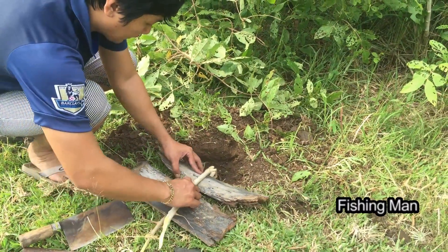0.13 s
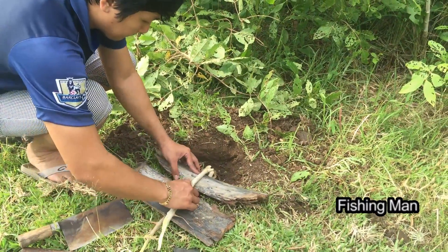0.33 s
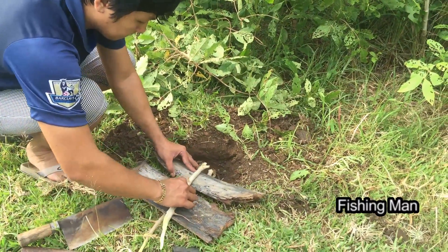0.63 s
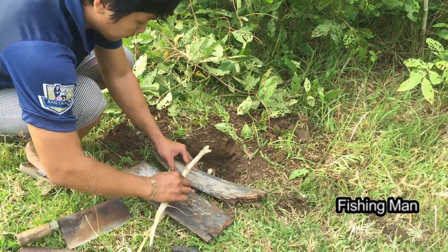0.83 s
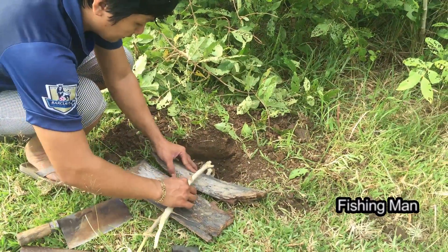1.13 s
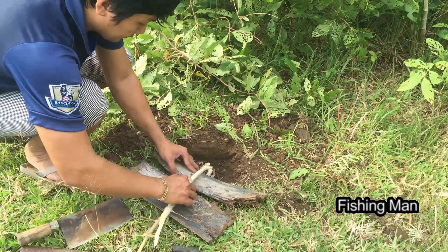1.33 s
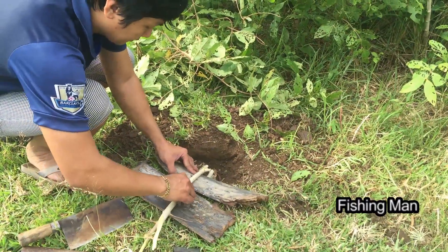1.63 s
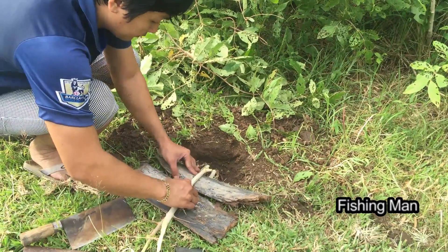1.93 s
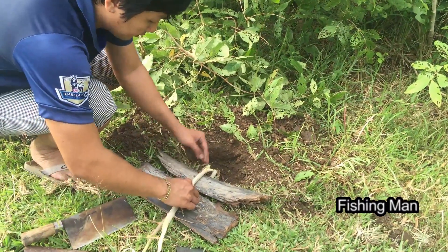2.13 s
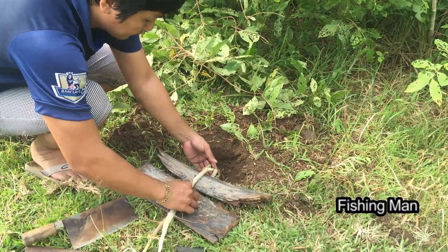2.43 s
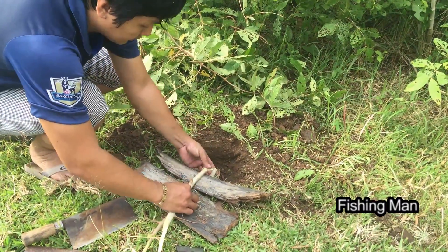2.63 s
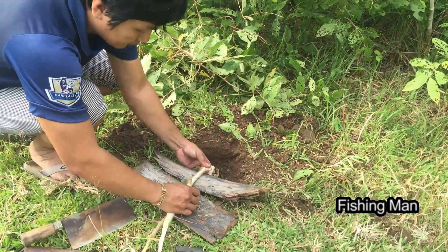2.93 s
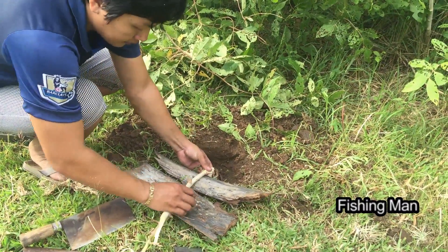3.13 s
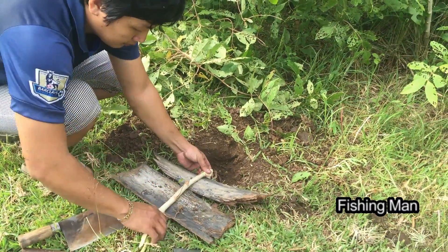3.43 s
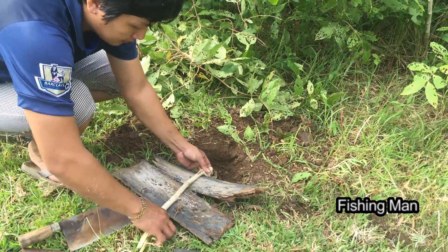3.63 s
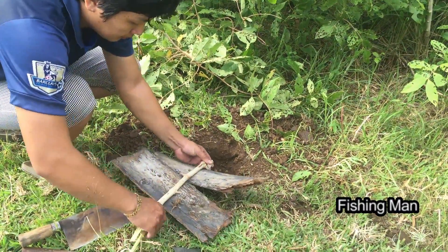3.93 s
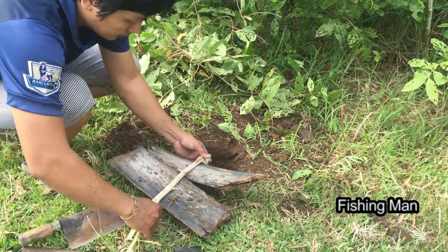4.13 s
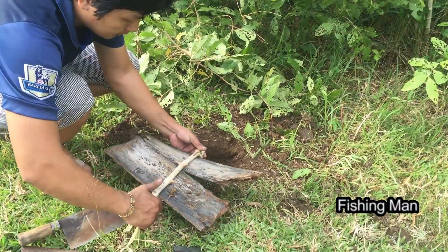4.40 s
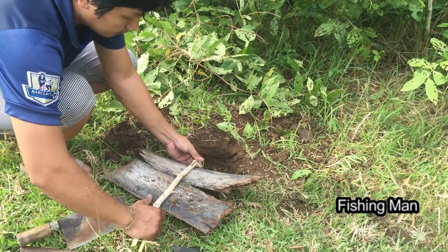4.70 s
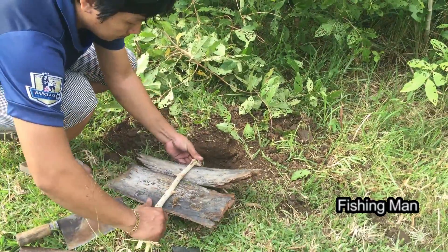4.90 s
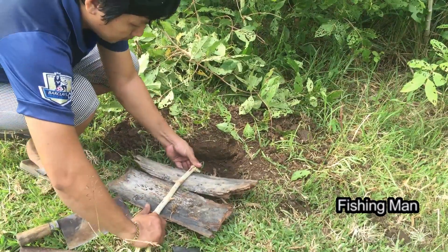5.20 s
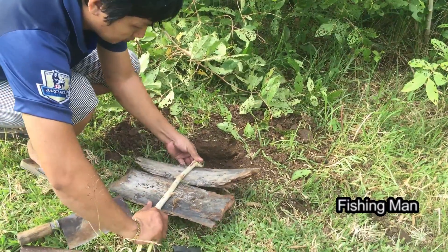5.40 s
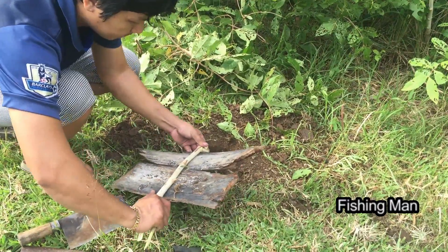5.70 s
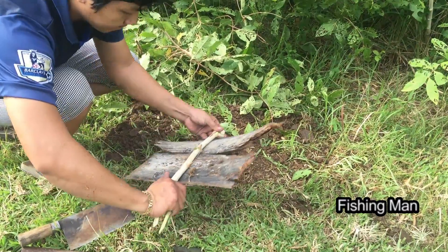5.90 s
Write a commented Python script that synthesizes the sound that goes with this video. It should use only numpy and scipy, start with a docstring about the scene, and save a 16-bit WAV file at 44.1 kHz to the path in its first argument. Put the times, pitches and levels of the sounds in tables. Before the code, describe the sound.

Outdoors, bark and stick snap, knock and lightly scrape, one sharp knock standing out, while birds chirp nearby and a distant engine hums.

```python
"""A motor drones far off over open-country air and dry grass rustles throughout. Someone crouching on grass fits
a stick across two bark slabs: fibres snap (click clusters), dead wood knocks (damped slab modes), soil bumps
(low cycles), scrapes (sparse clicks), then splinter pings (decaying sines) and rubs (slips ringing the slab).
Small birds (gliding tones) join early: whistles, slurs, then scolds (tone plus noise), chips and, late, a
nasal chatter. Ground and vegetation scatter a faint tail."""
import sys
import numpy as np
from scipy import signal
from scipy.fft import rfft
from scipy.io import wavfile
from scipy.ndimage import map_coordinates

SR = 44100
rng = np.random.default_rng(int(sys.argv[2]) if len(sys.argv) > 2 else 0)


def put_to_file(sound):
    """Save the sound as 16-bit audio at rate SR, in the file named by the first command-line argument."""
    columns = np.atleast_2d(sound).T  # one column per channel
    safe = np.clip(columns, -1, 1)
    whole_steps = np.round(safe * 32767)
    wavfile.write(sys.argv[1], SR, whole_steps.astype(np.int16))


N = 266937

# Colour of clicks on dry bark and blades. Each row: frequency in Hz, gain in dB.
BARK_COLOUR = [(300, 3.5), (900, 5), (2000, 2), (3200, 1.5), (4300, 1), (6200, -0.5), (7300, -3.5),
               (8500, -2.5), (10700, -10.5), (12300, -6), (16000, -10.5)]
SLUR_RISE_SHARE = 0.298  # onset of a slur or chatter note over its length


def undb(db):
    """Decibels to amplitude ratio."""
    return 10 ** (np.asarray(db) / 20)


def unit(x):
    """Scale to rms 1."""
    return x / np.sqrt(np.mean(x ** 2))


def add(out, start_s, x):
    """Mix x into out from start_s, cropping at both ends."""
    i = int(round(start_s * SR))
    a, b = max(i, 0), min(i + len(x), N)
    out[a:b] += x[a - i:b - i]


def colour(x, points, tilt_db=0):
    """Shape by a (Hz, dB) spectrum and a slope in dB per octave above 1 kHz; rms 1."""
    hz, db = np.transpose(points)
    octave = np.log2(np.fft.rfftfreq(len(x), 1 / SR) + 1)
    gain_db = np.interp(octave, np.log2(hz), db)
    gain_db = gain_db + tilt_db * np.maximum(octave - np.log2(1000), 0)
    return unit(np.fft.irfft(rfft(x) * undb(gain_db), len(x)))


def walk(rate_hz, n):
    """Smooth random curve through rate_hz knots per second, spread near 1."""
    knots = np.arange(n) / SR * rate_hz
    return map_coordinates(rng.standard_normal(8192), [knots], order=2, mode="mirror")


def random_clicks(n, grain_db, cap, per_s):
    """Sparse clicks of random sign and size; cap limits the exponential draw."""
    sizes = undb(grain_db * np.minimum(rng.exponential(size=n), cap))
    return sizes * rng.choice([-1, 1], n) * (rng.random(n) < per_s / SR)


def motor(waver_db=3.5):
    """A far engine speeds up evenly, loudest midway: only low orders carry, each wavering on the way."""
    # Levels in dB of multiples 1-5 of the firing rate.
    orders_db = [-6.5, 1, -6.5, -15, -24.5]
    firing_hz, rise_hz_per_s = 58.4, 0.9
    peak_db, loudest_s, fade_db_per_s = -54, 2.67, 2.04
    t = np.arange(N) / SR
    hz = (firing_hz + rise_hz_per_s * t) * (1 + 0.0035 * walk(11, N))
    phase = 2 * np.pi * np.cumsum(hz) / SR
    drone = np.zeros(N)
    for k, order_db in enumerate(orders_db, 1):
        level = undb(order_db + waver_db * walk(4.7, N))
        drone += level * np.sin(k * phase + 2 * np.pi * rng.random())
    return np.sqrt(2) * drone * undb(peak_db - fade_db_per_s * np.abs(t - loudest_s))


def air(level_db=-50, drift_db=0.9):
    """Shaped noise: distant rumble and soft open-country hiss that swells and sinks a little."""
    # Each row: frequency in Hz, relative density in dB per Hz.
    air_colour = [(22, -34.5), (40, -12), (55, -1), (110, -4), (160, -9), (240, -21), (380, -32),
                  (800, -45), (1400, -36.5), (2600, -41), (4500, -44), (9000, -49.5), (10500, -48),
                  (15800, -51.5)]
    return colour(rng.standard_normal(N), air_colour) * undb(level_db + drift_db * walk(7, N))


def slab(centre_hz, spread_oct, tuning=1):
    """The slab's short causal ring on soil; the contact point decides which damped modes speak."""
    # Each row: mode in Hz before tuning, width in Hz, level in dB.
    modes = [(325, 130, -1), (614, 95, 4.5), (790, 130, -9.5), (907, 140, -0.5), (1049, 91, 3.5),
             (1550, 120, -3.5), (1892, 180, -12.5), (2260, 170, -5.5), (3200, 250, -12), (3520, 550, -16),
             (4270, 390, -22), (6110, 500, -37.5)]
    f = np.fft.rfftfreq(4096, 1 / SR) + 1
    hz, width_hz, db = np.transpose(modes)[:, :, None]
    detune = (f ** 2 - (hz * tuning) ** 2) / (f * width_hz)
    power = np.sum(undb(db) ** 2 / (1 + detune ** 2), axis=0)
    gain = np.sqrt(power) * np.exp(-.5 * (np.log2(f / centre_hz) / spread_oct) ** 2)
    # minimum phase: fold the cepstrum onto positive time
    cepstrum = np.fft.irfft(np.log(gain + gain.max() / 1000))
    half = len(cepstrum) // 2
    folded = np.r_[cepstrum[0], 2 * cepstrum[1:half]]
    return np.fft.irfft(np.exp(np.fft.rfft(folded, 2 * half)))[:half]


def grass(rustle_db=-71, wood_db=-73.0, stir_db=6.0):
    """Dry blades tick in fits under hands and feet; the nudged slab murmurs faintly."""
    def ticks():
        """Clicks whose strength comes and goes."""
        return random_clicks(N, 3.0, 3, per_s=400) * undb(stir_db * np.tanh(walk(22, N)))
    murmur = unit(signal.fftconvolve(ticks(), slab(1520, 1.0))[:N])
    rustle = colour(ticks(), BARK_COLOUR, tilt_db=-2.5)
    return undb(rustle_db) * rustle + undb(wood_db) * murmur


def fibres(table, rise_share, grain_db, per_s, ring_db):
    """Clusters of fibre clicks swell and die, coloured by bark and each spot's own resonances."""
    out, t = np.zeros(N), np.arange(-8192, 16384) / SR
    hz = np.linspace(300, 16000, 48)
    bark_hz, bark_gain_db = np.transpose(BARK_COLOUR)
    bark_db = np.interp(np.log(hz), np.log(bark_hz), bark_gain_db)
    for peak_s, db, fall_s, tilt_db in table:
        shape = np.exp(-np.maximum(-t / rise_share, t) / fall_s)
        clicks = random_clicks(len(t), grain_db, 4, per_s)
        spot = np.c_[hz, bark_db + ring_db * rng.standard_normal(len(hz))]
        cluster = colour(clicks * shape, spot, tilt_db)
        add(out, peak_s + t[0], cluster * np.sqrt(np.mean(shape ** 2)) * undb(db))
    return out


def snaps():
    """Bark fibres and dry blades snap in quick dense clusters."""
    # Each row: peak in seconds, level in dB, fall constant in seconds, tilt in dB per octave.
    snap_rows = [(.009, -41, 0.0064, 1), (.027, -54.5, 0.0036, 1), (.0995, -52, 0.0013, 0),
                 (.2166, -35, 0.0038, 3), (.589, -49, 0.0018, -2), (.855, -51.5, 0.0027, 0),
                 (.872, -53, 0.0025, 0), (1.5484, -39, 0.0012, -5), (1.5518, -28.5, 0.00093, 8),
                 (1.5538, -37, 0.0041, -1.5), (1.5675, -20, 0.0022, -9), (2.125, -47, 0.0011, -0.5),
                 (2.182, -53.5, 0.013, 1), (2.1877, -46, 0.001, 1), (2.792, -55, 0.0016, -1.5),
                 (3.7008, -43, 0.0054, -2), (3.7264, -28.5, 0.0034, 1.5), (3.734, -44, .003, 4),
                 (4.0608, -49.5, 0.003, 18), (4.2965, -52.5, 0.0011, 5), (4.6235, -51, 0.0017, -1.5),
                 (4.6704, -49, 0.00076, 3), (5.805, -53, 0.003, 3), (5.815, -53.5, 0.0048, 2.5),
                 (6.0295, -52, 0.0015, 2)]
    return fibres(snap_rows, rise_share=0.64, grain_db=1.5, per_s=14000, ring_db=1.5)


def knocks(bend_hz=800, bend_q=0.94):
    """Dead wooden knocks; bending waves spread each one a little, the high ones arriving first."""
    # Each row: start in seconds, peak in dB, centre of the excited modes in Hz, their spread in octaves,
    # tuning of the modes under the grip as a ratio.
    contacts = [(0.0986, -32, 1390, 0.36, 0.9), (1.5526, -29, 1190, 0.64, 1.05),
                (1.5664, -6, 960, 1.76, 0.98), (1.5708, -24.5, 797, 0.81, 0.98),
                (1.5736, -24, 850, 0.73, 0.91), (2.1575, -47, 1300, 0.38, 1.2),
                (2.178, -42, 2080, 0.67, .97), (3.4126, -39, 520, 0.78, 1.13), (3.659, -47, 1060, 0.4, 1),
                (3.7, -30, 830, 0.26, 0.84), (3.7269, -21, 1150, 0.45, 0.99),
                (3.751, -41.5, 368, 0.48, 1.04), (3.869, -48, 1310, 0.64, 1.24),
                (4.2685, -44.5, 560, 0.66, 1.08), (4.296, -47.5, 1330, 0.42, 1.34),
                (4.6239, -52, 396, 0.26, 1.03), (5.066, -46.5, 800, 1.4, 1.25),
                (5.077, -39.5, 537, 0.29, 0.87)]
    out, w = np.zeros(N), 2 * np.pi * bend_hz
    allpass = signal.bilinear([1, -w / bend_q, w * w], [1, w / bend_q, w * w], SR)
    for start_s, peak_db, centre_hz, spread_oct, tuning in contacts:
        ring = signal.lfilter(*allpass, slab(centre_hz, spread_oct, tuning))
        add(out, start_s, ring * undb(peak_db) / np.abs(ring).max())
    return out


def bumps(soil_hz=232.2, swell_s=0.013):
    """Soft pushes ring the same patch of ground: a few low wavering cycles swell and fade."""
    # Each row: start in seconds, envelope peak in dB.
    pushes = [(0.119, -43), (1.847, -43.5), (2.055, -47), (2.975, -42), (3.184, -46), (5.511, -45.5),
              (5.912, -46)]
    out, t = np.zeros(N), np.arange(SR // 6) / SR
    shape = t / swell_s * np.exp(1 - t / swell_s)
    for start_s, db in pushes:
        phase = 2 * np.pi * np.cumsum(soil_hz * (1 + 0.14 * walk(170, len(t)))) / SR
        add(out, start_s, undb(db) * shape * np.sin(phase))
    return out


def scrapes():
    """Stick and fingers slide over dry bark and grass: slower, sparser clicks."""
    # Each row: peak in seconds, level in dB, fall constant in seconds, tilt in dB per octave.
    slides = [(.13, -54.5, 0.054, -5), (.25, -56, 0.03, -1.5), (.49, -64, 0.068, -1),
              (.71, -59.5, 0.044, -3), (.86, -58, 0.022, -2.5), (1.115, -62.5, 0.036, -7),
              (1.585, -52, .012, 1), (1.635, -60, 0.06, -3.5), (1.733, -50, 0.019, -3),
              (3.14, -61, 0.03, -1.5), (3.335, -67, 0.015, 7), (3.438, -59, 0.02, 1),
              (3.77, -59.5, 0.088, 2), (3.97, -65, 0.09, 4), (4.77, -66, 0.054, 2.5), (4.9, -59, 0.019, -3),
              (5.085, -55.5, 0.018, -3.5), (5.245, -63, 0.065, 2.5), (5.78, -63.5, 0.055, 3),
              (5.99, -63, 0.04, 4)]
    return fibres(slides, rise_share=0.94, grain_db=1.0, per_s=1700, ring_db=3.0)


def whistle(length_s, start_hz, end_hz, hoarse_hz, harmonics_db=(0,), onset_s=0.0017, fade_s=0.011, arch_hz=0):
    """A note glides fast, then settles, and may arch; hoarseness flutters pitch and breaks up level."""
    t = np.arange(int(length_s * SR)) / SR
    hz = start_hz + (end_hz - start_hz) * (t / length_s) ** 0.78
    hz = hz + hoarse_hz * walk(905.4, len(t)) * 1.4
    hz = hz + arch_hz * (np.sin(np.pi * t / length_s) - 2 / np.pi)
    phase = 2 * np.pi * np.cumsum(hz) / SR
    flutter = unit(undb(min(hoarse_hz / 20, 4.5) * walk(130, len(t))))
    ramp = np.minimum(np.minimum(t / onset_s, (length_s - t) / fade_s), 1)
    shape = np.sin(np.pi / 2 * ramp) ** 2
    tone = sum(undb(db) * np.sin(k * phase) for k, db in enumerate(harmonics_db, 1))
    return np.sqrt(2) * shape * flutter * tone


def swell(note, growth_db):
    """A whistle catches just after its start and swells mid-note; overall it grows or fades."""
    t, along = np.arange(len(note)) / SR, np.linspace(0, 1, len(note))
    catch_db = -4 * np.exp(-.5 * ((t - 0.025) / 0.006) ** 2)
    swell_db = 2.5 * (np.sin(np.pi * along) - 2 / np.pi)
    return note * undb(swell_db + catch_db + growth_db * (along - .5))


def sagging_whistles(end_hz=2665, hoarse_hz=8):
    """One bird repeats a plain whistle that sags to the same closing pitch."""
    # Each row: start in seconds, length in seconds, start pitch in Hz, level in dB before the swell,
    # growth over the note in dB.
    calls = [(0.132, 0.044, 2760, -64, 0), (0.346, 0.058, 2810, -66, -9), (0.566, 0.088, 2925, -60.5, -13),
             (0.784, 0.091, 2770, -58, 7.5), (1.025, 0.096, 2775, -54, 3),
             (1.264, 0.089, 2880, -53.5, -4.5)]
    out = np.zeros(N)
    for start_s, length_s, start_hz, db, growth_db in calls:
        note = whistle(length_s, start_hz, end_hz, hoarse_hz)
        add(out, start_s, undb(db) * swell(note, growth_db))
    return out


def slurs(fade_share=0.42):
    """Far peeps and hoarse calls glide downwards."""
    # Each row: start in seconds, length in seconds, start and end pitch in Hz, level in dB,
    # hoarseness in Hz before the whistle's own gain.
    calls = [(0.896, 0.026, 3730, 3640, -68, 30), (1.226, .034, 3430, 3220, -70, 40),
             (1.22, 0.15, 2980, 2860, -66, 109), (1.834, 0.058, 3090, 2790, -63.5, 149),
             (2.027, 0.039, 3230, 2800, -62, 110), (2.039, 0.078, 2670, 1950, -66.5, 150),
             (4.07, .28, 3000, 2873, -63, 140), (4.347, .17, 2750, 2230, -71.5, 80),
             (5.048, 0.29, 2640, 1464, -69, 50)]
    out = np.zeros(N)
    for start_s, length_s, start_hz, end_hz, db, hoarse_hz in calls:
        note = whistle(length_s, start_hz, end_hz, hoarse_hz,
                       onset_s=SLUR_RISE_SHARE * length_s, fade_s=fade_share * length_s)
        add(out, start_s, undb(db) * note)
    return out


def pings(onset_s=0.0004):
    """The thin stick and its splinters slip free, each ringing on one short decaying sine."""
    # Each row: start in seconds, level in dB before onset and decay, pitch in Hz, t60 in seconds.
    splinters = [(1.552, -26.5, 6760, 0.0078), (2.1245, -39, 11750, 0.01), (2.177, -39, 2930, 0.029),
                 (2.181, -44.5, 1470, 0.052)]
    out, t = np.zeros(N), np.arange(SR // 10) / SR
    for start_s, db, hz, t60_s in splinters:
        shape = (1 - np.exp(-t / onset_s)) * np.exp(-np.log(1000) * t / t60_s)
        add(out, start_s, undb(db) * shape * np.sin(2 * np.pi * hz * t))
    return out


def rubs(slips_per_s=1300):
    """The stick rubs with some weight on the bark: uneven little slips each ring the slab."""
    # Each row: peak in seconds, level in dB, half length (Gaussian sigma) in seconds, centre in Hz,
    # spread in octaves.
    strokes = [(1.733, -59, .018, 980, 0.35), (2.131, -59, 0.0073, 1300, 0.48),
               (2.159, -57.5, 0.028, 1450, 0.36), (2.66, -62, 0.011, 1830, 0.31),
               (3.323, -58.5, 0.011, 910, 0.12), (3.368, -57.5, 0.017, 1100, 0.44),
               (3.435, -60, 0.011, 1900, 0.42), (3.695, -57, 0.013, 910, 0.47),
               (4.278, -55.5, 0.0061, 546, 0.88), (4.372, -54.5, 0.0065, 750, 0.83),
               (5.738, -63, 0.027, 1040, 0.37), (5.943, -63.5, 0.018, 1030, 0.22)]
    out, t = np.zeros(N), np.arange(-SR // 6, SR // 6) / SR
    for peak_s, db, half_s, centre_hz, spread_oct in strokes:
        slips = rng.uniform(-0.36, 1, len(t)) * (rng.random(len(t)) < slips_per_s / SR)
        shape = np.exp(-.5 * (t / half_s) ** 2)
        murmur = unit(signal.fftconvolve(slips, slab(centre_hz, spread_oct))[:len(t)] * shape)
        add(out, peak_s + t[0], undb(db) * murmur * np.sqrt(np.mean(shape ** 2)))
    return out


def rasp(rough_db=3, swell_s=0.019, tail_s=0.071, tail_db=-6):
    """The grating noise body of a scold: it swells quickly and lingers in the bushes."""
    # Each row: frequency in Hz, gain in dB.
    rasp_colour = [(600, -19.5), (1200, -6), (2200, -2), (3100, -6), (4000, -8.5), (5500, -45)]
    t = np.arange(SR // 2) / SR
    body = t / swell_s * np.exp(1 - t / swell_s)
    tail = undb(tail_db) * np.minimum(t / swell_s, 1) * np.exp(-t / tail_s)
    rough = rng.standard_normal(len(t)) * undb(rough_db * walk(296, len(t)))
    return colour(rough, rasp_colour) * np.hypot(body, tail)


def scolds(length_s=0.05, hz=3690, hoarse_hz=60):
    """Harsh scolds: a high note over a broad rasp."""
    # Each row: start in seconds, note level in dB, rasp level in dB.
    calls = [(2.444, -63, -59), (4.525, -69, -65.5), (4.722, -63, -58)]
    out = np.zeros(N)
    for start_s, note_db, rasp_db in calls:
        add(out, start_s, undb(note_db) * whistle(length_s, hz, hz, hoarse_hz, fade_s=0.043))
        add(out, start_s, undb(rasp_db) * rasp())
    return out


def chip(hz, glide_hz, peak_s=0.011):
    """A short arched note that swells to a point and dies away."""
    note = whistle(0.044, hz, hz + glide_hz, hoarse_hz=30, arch_hz=70)
    age = np.arange(len(note)) / SR / peak_s
    return note * (age * np.exp(1 - age)) ** 3


def chips():
    """Another bird sings quick chips, each a breathy high lisp dropping onto a clear note."""
    # Each row: start of the note in seconds, pitch in Hz, glide in Hz, note level in dB, lisp level in dB.
    calls = [(2.893, 2944, 34, -54.5, -75), (2.984, 2942, 125.5, -50.5, -66),
             (3.067, 3040, 180, -58, -63.5), (3.156, 3000, 60, -61, -62), (3.244, 3050, -48, -53.5, -65),
             (3.324, 3077, -330, -52, -64), (3.41, 2920, 59, -58.5, -64), (3.497, 2690, 257, -57.5, -60),
             (3.596, 3035, -150, -56.5, -71), (3.872, 2990, 2, -53.5, -73), (3.959, 3020, 0, -53.5, -70)]
    lisp_lead_s, lisp_s, lisp_ratio, fall_hz, hoarse_hz = 0.021, 0.039, 1.31, 452, 208
    out = np.zeros(N)
    for start_s, hz, glide_hz, note_db, lisp_db in calls:
        high_hz = hz * lisp_ratio
        lisp = whistle(lisp_s, high_hz + fall_hz / 2, high_hz - fall_hz / 2, hoarse_hz,
                       onset_s=0.0087, fade_s=0.024)
        add(out, start_s - lisp_lead_s, undb(lisp_db) * lisp)
        add(out, start_s, undb(note_db) * chip(hz, glide_hz))
    return out


def chatter():
    """A fading, evenly spaced run of nasal notes with patchy harmonics, a rising squeak from midway in each."""
    # Levels in dB of harmonics 1-4, before the random patchiness.
    nasal_db = [-2, -3, -9, -1]
    # Level in dB of the squeak in each note.
    squeak_levels_db = [-69, -61, -67, -66, -67]
    start_s, period_s, note_s = 5.502, 0.0415, 0.028
    base_hz, scatter, rise_hz, patchy_db = 1055, 0.0072, 18, 2.5  # scatter: relative
    first_db, fade_db_per_s = -65.5, 27
    squeak_lag_s, squeak_s, squeak_hz, squeak_rise_hz = 0.013, 0.03, 3230, 130
    out = np.zeros(N)
    for k, squeak_db in enumerate(squeak_levels_db):
        late_s = k * period_s
        hz = base_hz * (1 + scatter * rng.standard_normal())
        harmonics_db = nasal_db + patchy_db * rng.uniform(-0.76, 1, len(nasal_db))
        note = whistle(note_s, hz - rise_hz / 2, hz + rise_hz / 2, hoarse_hz=24,
                       harmonics_db=harmonics_db, onset_s=SLUR_RISE_SHARE * note_s)
        squeak = whistle(squeak_s, squeak_hz, squeak_hz + squeak_rise_hz, hoarse_hz=80)
        add(out, start_s + late_s, undb(first_db - fade_db_per_s * late_s) * note)
        add(out, start_s + late_s + squeak_lag_s, undb(squeak_db) * squeak)
    return out


def foliage(x, near_db, near_t60_s, far_db, far_t60_s):
    """Quick scatter from nearby ground and leaves, and a thin, patchy tail from the bushes."""
    # Echo colour. Each row: frequency in Hz, gain in dB.
    echo_colour = [(150, 0), (500, -10), (1200, 3), (3500, 8), (8000, -9), (16000, -16.5)]
    t = np.arange(SR) / SR
    power = np.zeros(len(t))
    for db, t60_s in [(near_db, near_t60_s), (far_db, far_t60_s)]:
        decay = unit(np.exp(-np.log(1000) * t / t60_s))
        power += (undb(db) * decay) ** 2 / len(t)
    noise = colour(rng.standard_normal(len(t)), echo_colour)
    scatter = unit(noise * undb(0.92 * walk(150, len(t))))
    return x + signal.fftconvolve(x, np.sqrt(power) * scatter)[:N]


def scene():
    """Wood and grass close by, birds in the bushes, motor and air behind them."""
    wood = grass() + snaps() + knocks() + bumps() + scrapes() + pings() + rubs()
    birds = sagging_whistles() + slurs() + scolds() + chips() + chatter()
    close = foliage(wood, near_db=-25, near_t60_s=.07, far_db=-30, far_t60_s=.6)
    distant = foliage(birds, near_db=-15, near_t60_s=.09, far_db=-22, far_t60_s=.7)
    return (close + distant + motor() + air())[None]


def record(dry, bass_hz=35, top_hz=15900):
    """The microphone loses the deepest bass and the very top."""
    bass_cut = signal.butter(3, bass_hz, "highpass", fs=SR, output="sos")
    top_cut = signal.ellip(10, .2, 70, top_hz, fs=SR, output="sos")
    return signal.sosfilt(top_cut, signal.sosfilt(bass_cut, dry))


dry = scene()
out = record(dry)
put_to_file(out)
```